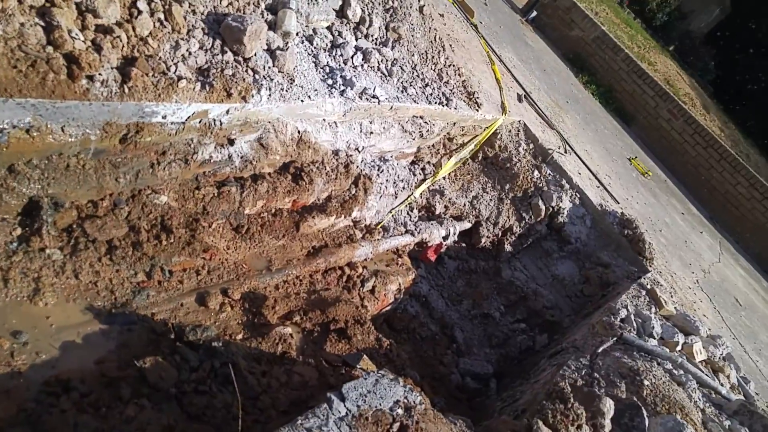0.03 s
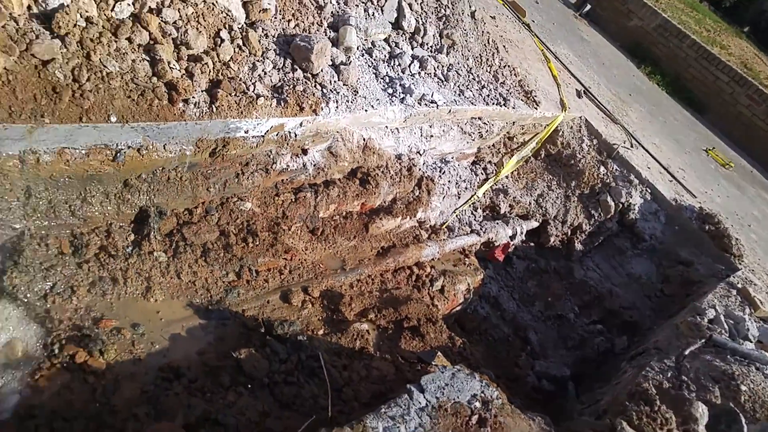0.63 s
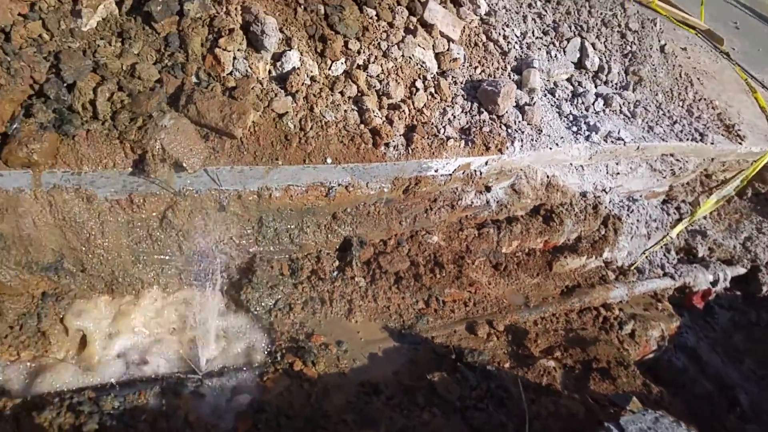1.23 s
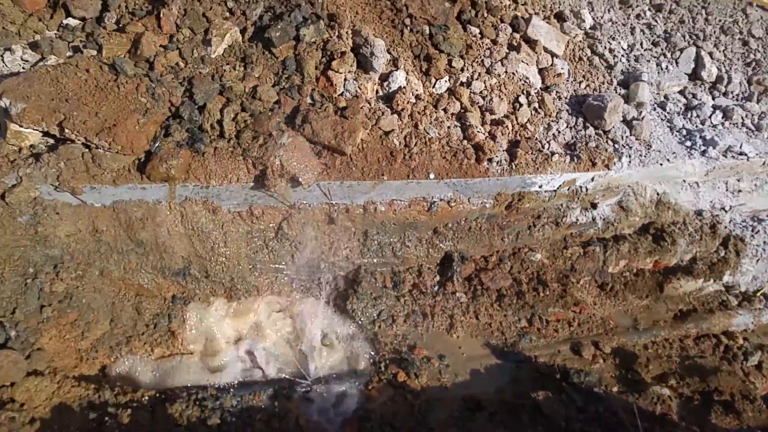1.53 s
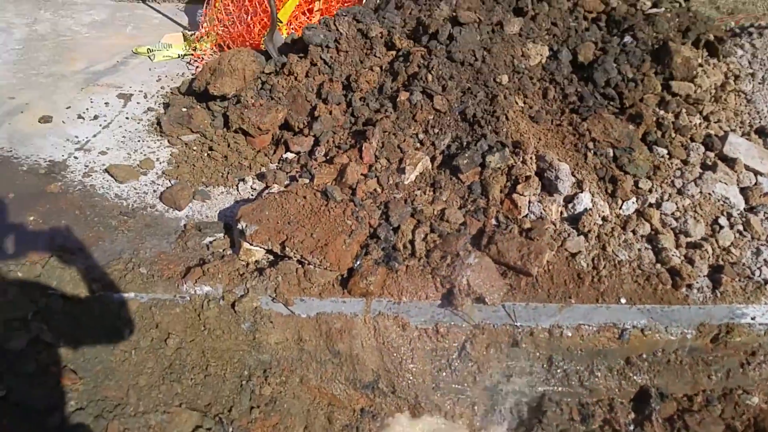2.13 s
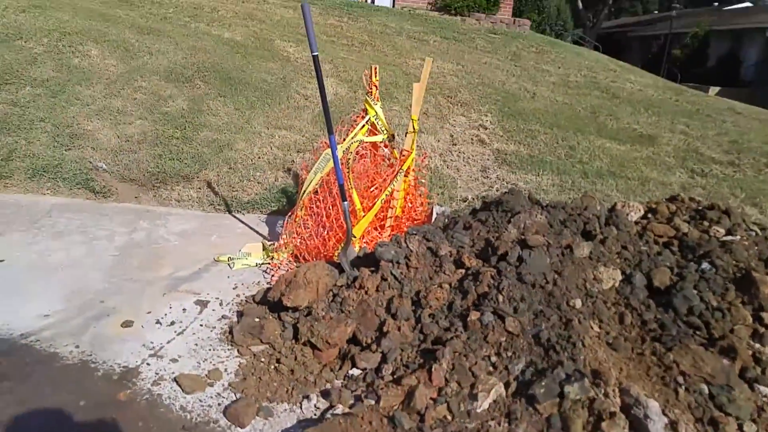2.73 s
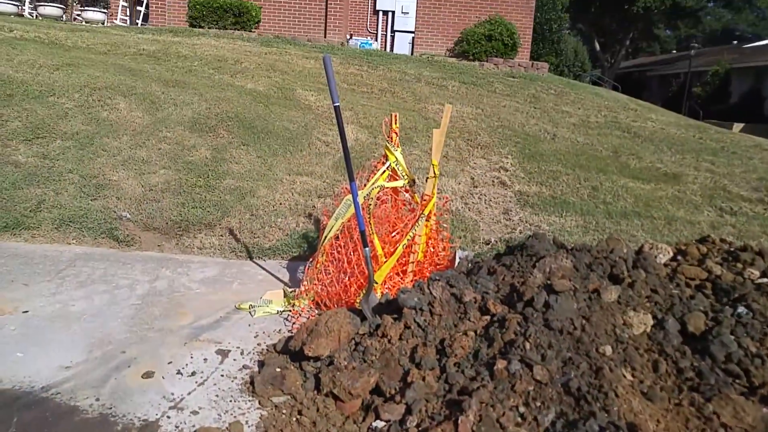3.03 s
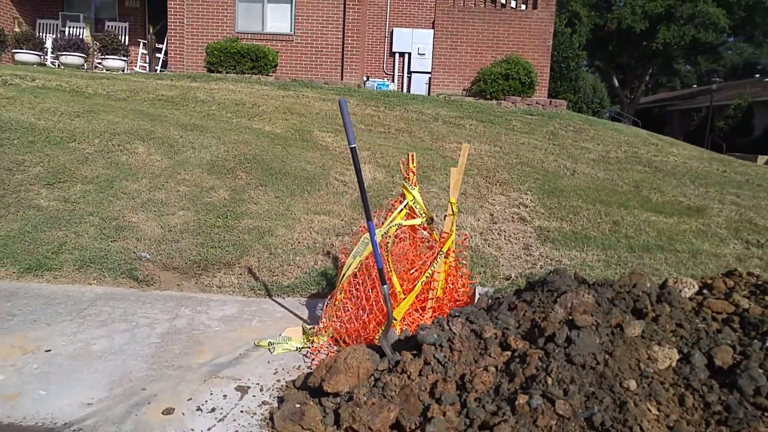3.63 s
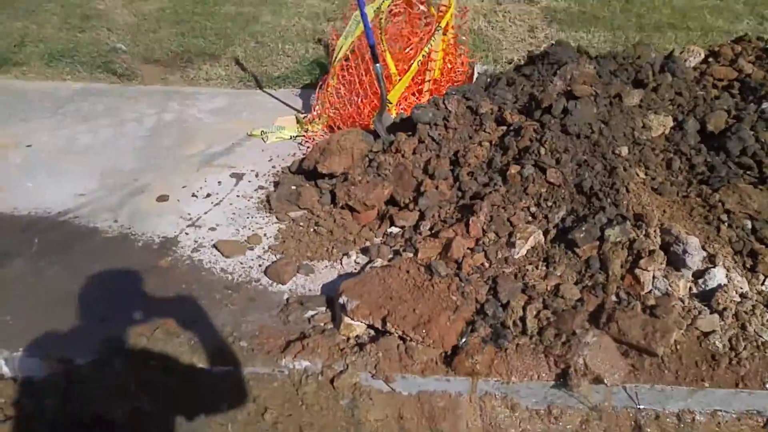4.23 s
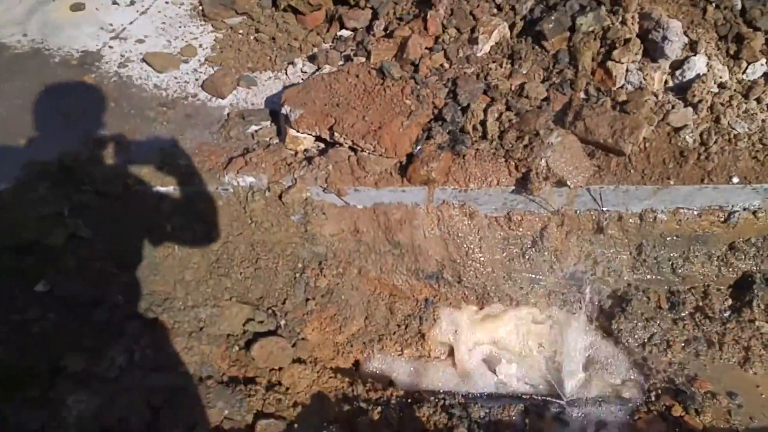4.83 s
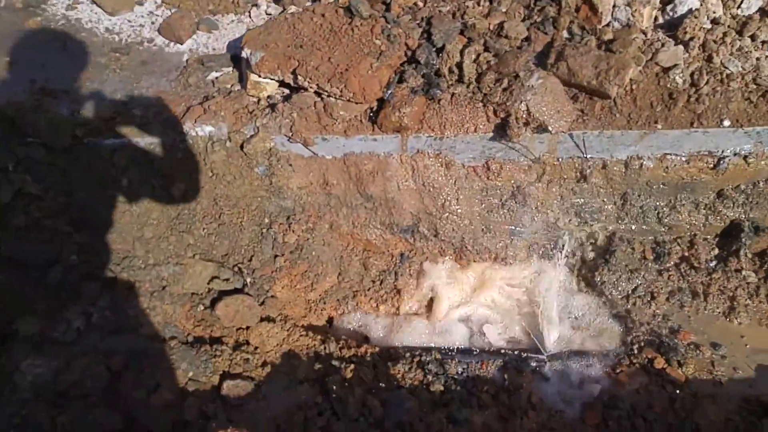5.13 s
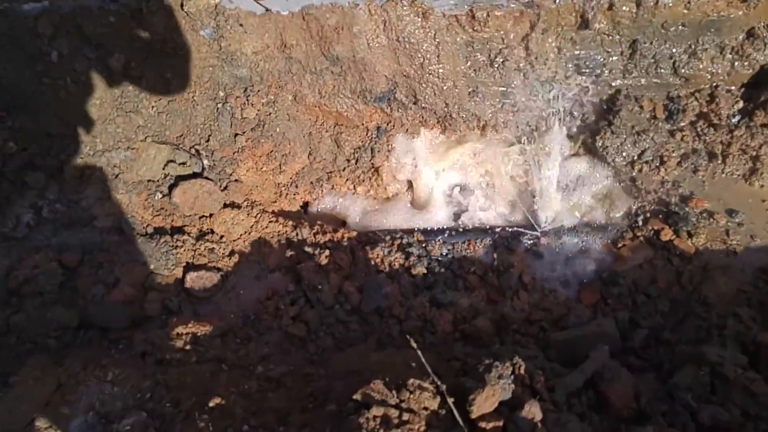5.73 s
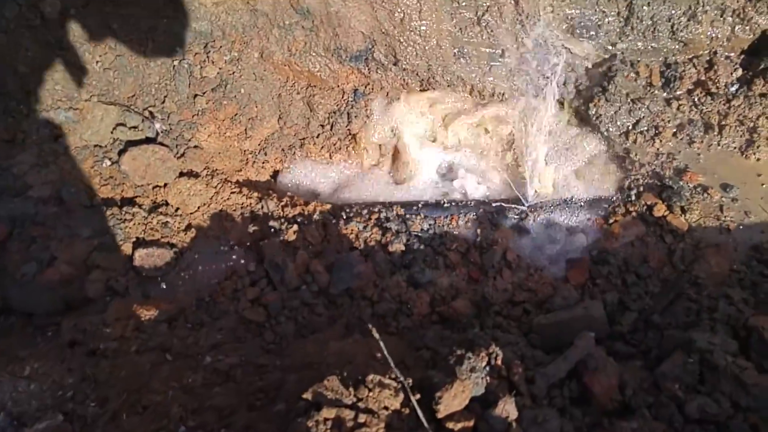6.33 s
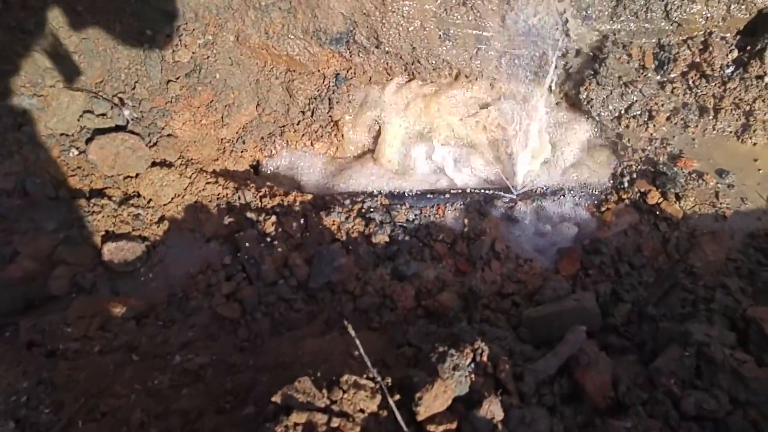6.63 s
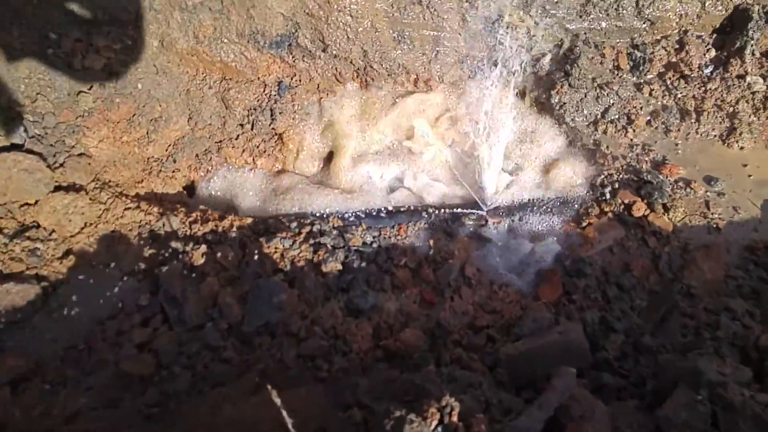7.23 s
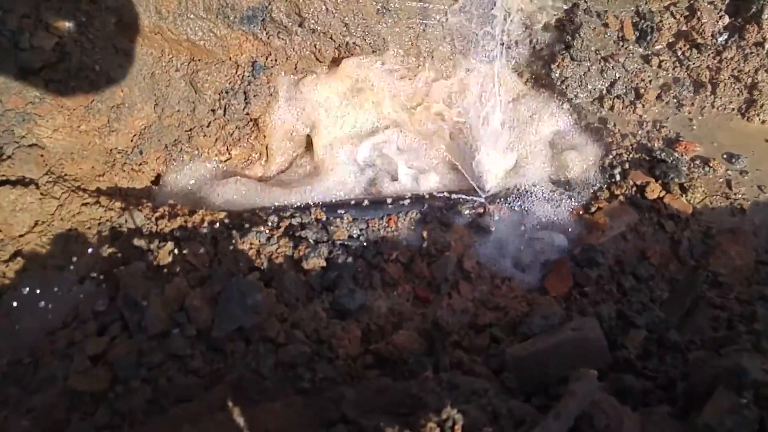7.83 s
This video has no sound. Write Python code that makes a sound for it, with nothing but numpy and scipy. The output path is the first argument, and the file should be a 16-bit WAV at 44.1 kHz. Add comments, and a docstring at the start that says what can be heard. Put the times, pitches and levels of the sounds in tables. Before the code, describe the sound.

A split water main sprays into an open earth trench with a hard, steady hiss, spattering the wall and churning a muddy pool over a low rumble. The tone of the water shifts as a hand-held stereo microphone swings past. Around the middle, wind thumps the microphone, mostly on the left. Near the end the microphone leans over the leak and the bubbling grows fuller.

```python
"""A hard hiss and steady splashing: a split water main sprays into an open earth trench.
The jet hisses at the crack, spatters the trench wall and churns a muddy pool full of ringing bubbles,
all throbbing slightly with the water pressure, over a low rumble. At the edge, a hand-held stereo
microphone swings past the leak and finally leans over it, which shifts the tone of the water.
A breeze buffets the microphone's two ports (its left and right openings)."""
import sys
import numpy as np
from scipy import signal
from scipy.fft import rfft, irfft, next_fast_len
from scipy.io import wavfile
from scipy.ndimage import map_coordinates

SR = 44100
rng = np.random.default_rng(int(sys.argv[2]) if len(sys.argv) > 2 else 0)


def inscribe(sig):
    """Save sig as 16-bit PCM at rate SR to the path in sys.argv[1].

    A 1-D sig is mono; a 2-D sig holds one channel per row.
    Samples are clipped to [-1, 1] before scaling.
    """
    pcm = np.round(np.clip(np.atleast_2d(sig).T, -1, 1) * 32767)
    wavfile.write(sys.argv[1], SR, pcm.astype(np.int16))


N = 348390
WINDOW, HOP = 2048, 512  # samples in one short frame of sound, and between frames
TIME = np.arange(N) / SR
FRAME_TIME = np.arange(-(-N // HOP) + 1) * HOP / SR
BIN_HZ = np.maximum(np.arange(WINDOW // 2 + 1) * SR / WINDOW, 1)

# Where the leak lies. Each row: time in seconds, share to the side, share ahead; the rest is below.
LEAK_DIRECTION = [(0, 1, 0.07), (.8, 0.84, 0), (1.8, 0.05, 0.34), (4.1, 0.06, 0.02), (5.3, 0.01, 1),
                  (7.9, 0.1, 0.97)]
# How late the leak's treble reaches the left port. Each row: time in seconds, delay in milliseconds.
LEFT_DELAY = [(0, -0.57), (.5, -0.51), (1, -0.38), (1.5, -0.23), (1.8, -0.1), (2.3, 0.013), (3.1, 0.11),
              (4.4, .14), (5.2, 0.1), (6, 0.08), (6.6, 0.049), (7.2, 0.039), (7.9, 0.039)]
# Unequal resonances delay the left treble further. Each row: pitch in Hz, phase lag in radians.
PORT_SKEW = [(7200, 0.098), (8600, 1.65), (12000, 1.2)]
# How alike the ports sound, 0 to 1. Each row: pitch in Hz, with the leak screened, with it ahead.
PORT_LIKENESS = [(40, 0.96, 1), (150, 0.98, 1), (400, 0.99, .98), (1100, 0.74, 0.98), (1500, 0.75, 0.99),
                 (2250, 0.72, 0.91), (3050, 0.12, .2), (3800, 0.27, 1), (6000, 0.41, 0.43),
                 (8000, 0.14, 0.11), (9400, 0.18, 0.41), (11400, 0.14, 0.15), (16000, .15, .15)]
# The moving wall echoes; shorter paths raise their pitch. Each row: time in seconds, pitch ratio, strength.
WALL_ECHO = [(0, 0.89, 0.94), (1.4, 0.97, 1.46), (2.4, 1.02, 1.4), (3.6, 1.07, 1.06), (5.2, 0.96, 1.47),
             (6.6, 0.92, 0.51), (7.9, 0.95, 0.13)]

# Gusts of wind. Each row: middle in seconds, half length in seconds, left and right strength in dB.
GUSTS = [(0.127, 0.056, -21.5, -27), (0.456, 0.11, -27, -29), (0.617, 0.047, -33, -29),
         (1.957, 0.052, -26, -35), (3.265, 0.022, -17.5, -36), (3.313, 0.033, -22.5, -38),
         (3.362, 0.017, -19, -36), (3.44, 0.067, -33, -40), (3.534, 0.025, -21, -24),
         (3.584, 0.068, -18, -25), (3.71, 0.05, -25.5, -42), (3.816, 0.037, -24.5, -42),
         (3.99, 0.033, -26, -44), (4.07, 0.025, -36, -24), (4.538, 0.087, -26.5, -53),
         (5.63, 0.32, -38, -49)]
# Single eddies that slap the left port. Each row: time in seconds, peak in dB, pitch in Hz.
SLAPS = [(3.251, -8, 260), (3.276, -13, 110), (3.365, -2, 210), (3.520, -8, 270), (3.547, -7, 120),
         (3.575, -6, 190), (3.628, -7, 95)]
# Tone of the wind's thump, its brighter buffeting and the rumble. Each row: pitch in Hz, gain in dB.
THUMP_TONE = [(15, -35), (30, -18), (50, 3), (70, -2.5), (110, -4), (170, -17.5), (300, -21.5), (500, -40),
              (1000, -78)]
BUFFET_TONE = [(40, -29), (100, 6), (200, -0.5), (350, -3.5), (450, -7), (550, -19), (680, -13), (900, -40),
               (2000, -82)]
RUMBLE_TONE = [(15, -45), (30, -22), (45, -3), (58, -0.5), (80, -2), (102, 2), (125, -1), (160, -4.5),
               (230, -48), (500, -68)]
# How the rumble, pool, splash and hiss swell and fade. Each row: time in seconds, relative level in dB.
RUMBLE_LEVEL = [(0, -38), (1.6, -43.5), (4.4, -45), (6.2, -42.5), (7.5, -37.5), (7.9, -39)]
CHURN_LEVEL = [(0, -29.5), (2.2, -29), (4.7, -31), (6.2, -30), (6.9, -28.5), (7.4, -26), (7.9, -24.5)]
SPLASH_LEVEL = [(0, -23.5), (1.1, -22), (2, -24.5), (3.1, -27), (4.4, -25), (4.75, -21.7), (5.05, -23),
                (5.5, -23.5), (7.1, -23.5), (7.6, -22)]
HISS_LEVEL = [(0.0, -21.5), (0.6, -21), (1.2, -22.5), (1.6, -22), (2.2, -22.5), (2.9, -22), (3.5, -21.5),
              (3.9, -24), (4.4, -22), (4.8, -20.5), (5.4, -22), (6.2, -22), (6.7, -22), (7.2, -20.5),
              (7.9, -21.5)]
# The throbbing water pressure. Each row: time in seconds, throbs per second.
THROB_RATE = [(0, 3.9), (5.2, 3.16), (5.6, 2.9), (6.1, 5.02), (7.9, 1.9)]

# Tone of the churning pool. Each row: pitch in Hz, gain in dB.
CHURN_TONE = [(70, -17), (140, -10), (200, -3), (290, -1), (370, 1.5), (450, -2), (520, -20.5),
              (650, -12.5), (1000, -70)]
# Hollow notes of the trench floor. Each row: pitch in Hz, width in Hz, relative weight in dB.
FLOOR_NOTES = [(370, 19, -1), (458, 31, 1)]
# How well those notes reach the microphone. Each row: time in seconds, lift in dB before weighting.
FLOOR_NOTE_LIFT = [(0, -0.5), (2, -0.5), (2.8, 7), (3.8, 1), (4.6, -2.5), (5.8, -4.5), (6.5, 1), (7, 4.5),
                   (7.45, 9), (7.9, 6)]
# A dip just under those notes. Each row: time in seconds, pitch in Hz, gain in dB.
FLOOR_DIP = [(5, 324, -5), (6, 320, -13), (7, 322, -8.5), (7.9, 315, -5)]

# Tone of the splash. Each row: pitch in Hz, gain in dB from behind the trench edge, then from above it.
SPLASH_TONE = [(308, -66, -41), (483, -4, 6.5), (553, -3.5, 3), (614, -4.5, 7), (674, -5, -1.5),
               (736, 0, 1), (920, 4, 0), (1170, -2, 0.5), (1610, -4, -0.5), (2090, -8.5, -1.5),
               (2630, -8, -16), (2920, -44, -43)]
# Where wall echoes cancel the splash. Each row: pitch in Hz, exponent on the echo's pitch ratio,
# then depth in dB (at echo strength 1) with the leak to the side, below and ahead.
WALL_NULLS = [(528, 0.45, 22, 9.8, 13), (725, 1.3, 1.5, 11.3, 1), (1421, 0.14, 6, 6.3, 4.1),
              (2107, 1.3, 2, 5.3, 4.2)]
# Four moving bands in the splash. Each row: time in seconds, pitch in Hz, gain in dB.
STANDING_WAVE = [(0, 874, 4.5), (1.5, 950, 1), (2.5, 1060, -1.5), (4.8, 1140, -0.5), (5.8, 1070, -2.5),
                 (6.5, 1000, 6), (7, 915, 6.5), (7.5, 806, 6.5), (7.9, 816, 6.5)]  # rings across the trench, sinking as the microphone leans in
TRENCH_TROUGH = [(5.2, 920, -5), (5.8, 875, -6), (6.2, 825, -5), (6.55, 810, -5), (7, 706, -7),
                 (7.5, 685, -1), (7.9, 675, -5)]  # a dip below the standing wave, sinking with it
EDGE_NULL = [(4.8, 2080, 2), (5.25, 1860, -3), (5.7, 1680, -13), (6.1, 1360, -2), (6.8, 1290, -6),
             (7.4, 1300, -1.5)]  # a cancelled band that falls as the microphone clears the edge
PASSING_PEAK = [(1.3, 1800, 0), (1.8, 1900, 4.5), (2.1, 1950, 4), (2.7, 1900, 0)]  # a bright band that swells as the microphone swings past

# Tone of the hiss from the side, below and ahead. Each row: pitch in Hz, left and right gain in dB.
HISS_ASIDE = [(1900.0, 2.5, -17), (2640, 0.5, -14), (3270, 4.5, 2), (3740, 0.5, 0.9), (4460, 1, -0.5),
              (5600, 0.8, -5), (6070, 0.5, 3.5), (6760, 9, 18), (7700, 1, 8), (8140, 7, -0.5),
              (9400.0, 1, 5.5), (10300, -0.5, 3), (11600.0, 0, -6.5), (13200.0, -2.5, -3),
              (15600.0, -6, -8)]
HISS_BELOW = [(1900.0, -0.5, -7), (2550.0, 3.7, -19), (3270, 2.8, -6), (3700.0, 5.5, -6),
              (4300, -5.5, -0.5), (5200.0, -2, -0.3), (6300, -6, 4), (6900.0, 1.5, -4.0), (7600.0, 4, 0),
              (8430, 3, 12), (9430, 3, 6.5), (10600, 3, -1.5), (11600.0, 3, 2), (13200.0, 3, -2),
              (15600.0, -3.5, -1)]
HISS_AHEAD = [(1900,-4,-5.5), (2580,0,-7), (3120,-4.5,-6), (3900,-4.5,-7), (4520,-3,2), (5070,1,1.5),
              (6050,2,-2), (6860,1,3.5), (7560,5.5,3), (8160,9.5,1.1), (9300,7.5,9), (10570,0.5,6.5),
              (11700,-4,2.5), (13200,-2.5,0.5), (15600,-8,-7)]
# Two broad bands in the hiss. Each row: time in seconds, pitch in Hz, left and right gain in dB.
SINKING_BAND = [(0.0, 6940, -0.5, -12), (2.2, 6230, 2, 2.2), (3.3, 6070, 2.5, -3), (4.2, 6100.0, 2, 4),
                (4.7, 6450, 6.5, 3.7), (5.4, 6400.0, 5, 3.3), (6.2, 5760, 2, 3), (6.8, 5270, 1.8, 0.7),
                (7.3, 4870, 3, 1.5), (7.9, 4500.0, 5, 1)]  # louder or softer at each port, sinking as the microphone leans in
PORT_SIZZLE = [(0,8550,3,-1.5), (.6,8950,-0.5,2.5), (1,9200,4.5,6), (1.35,9000,6,5), (1.8,8740,0,6),
               (2.2,8600,5,8), (2.7,8360,5.5,3.5), (3.3,8500,4.5,-1.5), (3.7,8950,5.5,2.5),
               (4.15,8750,5,5.5), (4.5,8650,-2,3), (5,8800,-4,2), (5.5,8800,-3,1), (6.1,8900,3,4),
               (6.7,8800,4.5,7), (7.3,8500,3.5,2), (7.9,8700,3,4)]  # each port's own resonance, stirred by the jet
# Four narrower bands in the hiss. Each row: time in seconds, pitch in Hz, gain in dB.
LEFT_GAP = [(.8,5640,2), (1.5,5900,-3), (2.4,6100,-3.5), (3.3,5500,-4), (3.9,5100,-2), (4.3,4800,-6),
            (4.9,3900,-4), (5.5,3270,-9), (6.5,2930,-9), (7.9,3060,-4)]  # a gap at the left port, gliding as the microphone turns
RIGHT_GAP = [(0.0, 2550.0, -6), (1.5, 2750.0, -11), (2.3, 3000.0, -7), (3.3, 3100.0, -13),
             (4.4, 3200.0, -8.8), (5.0, 3220, -5), (5.6, 3100.0, -8), (6.6, 2950.0, -4), (7.9, 2920, -5)]  # the same at the right port
RIGHT_HIGH_GAP = [(.6, 8500, 0), (1.1, 8900, -2.5), (1.6, 10200, -5), (2.2, 11500, -7), (3.2, 13300, -3.5),
                  (4.2, 12900, -2.5), (5.4, 12500, -3.5), (7.9, 12100, -5)]  # a much higher cancelled band that sweeps up
HISS_RING = [(0, 3250, 1.5), (1.6, 3500, 2.5), (3.5, 3550, 2.5), (4.6, 3550, 0), (6.4, 3550, 0),
             (7.5, 3450, 3)]  # a hollow resonance just above the right gap
# The jet spurts or briefly falters. Each row: time in seconds, change in dB (the hiss takes a share).
SPURTS = [(.218,3), (.372,0), (.627,-2.5), (.975,3), (1.205,1), (1.547,3), (2.357,-0.5), (2.514,1.3),
          (3.161,1.5), (3.41,-1.1), (3.553,1.1), (4.072,3), (4.496,-1), (5.544,-1.5), (6.031,-2), (6.147,2),
          (6.249,-1.5), (6.438,2)]


def from_db(db):
    """Turn decibels into a gain to multiply by."""
    return 10 ** (np.asarray(db) / 20)


def unit_power(x):
    """Scale a signal to an average power of 1."""
    return x / np.sqrt(np.mean(np.abs(x) ** 2) + 1e-20)


def even_power(tone_db):
    """Keep the total power steady while a tone changes."""
    return tone_db - 10 * np.log10(np.mean(from_db(tone_db) ** 2, axis=-2, keepdims=True))


def in_time(rows, when):
    """Read each column of a table at the given times."""
    seconds, *columns = np.transpose(rows)
    return np.array([np.interp(when, seconds, column) for column in columns])


def in_hz(rows):
    """Read each column of a table at every pitch in BIN_HZ: columns x pitches x 1."""
    hz, *columns = np.transpose(rows)
    return np.array([np.interp(np.log(BIN_HZ), np.log(hz), column) for column in columns])[..., None]


def swell(middle_s, half_s):
    """A smooth rise and fall in time, of height 1."""
    return np.exp(-np.minimum(((TIME - middle_s) / half_s) ** 2, 50))


def hump(hz, width_hz):
    """A smooth peak around one pitch, of height 1."""
    return np.exp(-((BIN_HZ[:, None] - hz) / width_hz) ** 2)


def glide_db(rows, width_hz):
    """A peak or dip that moves in pitch and height, shared by the ports or with a height for each."""
    hz, *db = in_time(rows, FRAME_TIME)
    return np.array(db)[:, None] * hump(hz, width_hz)


def drift(per_s):
    """A smooth random wander of about size 1, turning roughly per_s times a second."""
    step = 40  # samples between random values
    pole = np.exp(-2 * np.pi * step * per_s / SR)
    noise = rng.standard_normal(N // step + 2002)
    slow = signal.lfilter([1], [1, -2 * pole, pole * pole], noise)[2000:]  # skip while it settles
    return np.interp(np.arange(N) / step, np.arange(len(slow)), unit_power(slow))


def shaped_noise(tone):
    """Two unrelated rows of steady noise with the given tone."""
    size = next_fast_len(N)
    gain = np.interp(np.arange(size // 2 + 1) * SR / size, BIN_HZ, from_db(in_hz(tone)).ravel())
    spectrum = rfft(rng.standard_normal((2, size))) * gain
    return unit_power(irfft(spectrum, size)[:, :N])


def leak_direction():
    """How much the leak lies to the side and how much ahead, each 0 to 1."""
    return np.clip(in_time(LEAK_DIRECTION, FRAME_TIME), 0, 1)


def at_ports(pair, tone_db):
    """Make stereo from two unrelated sounds: the first reaches both ports, the far one later."""
    framing = dict(nperseg=WINDOW, noverlap=WINDOW - HOP)
    shared, side = signal.stft(pair.astype(np.float32), **framing)[2]
    _, ahead = leak_direction()
    screened, in_view = in_hz(PORT_LIKENESS)
    alike = np.clip((1 - ahead) * screened + ahead * in_view, 0, 1)
    sign = np.array([1, -1])[:, None, None]
    ports = np.sqrt(1 + alike) * shared + sign * np.sqrt(1 - alike) * side
    hz = BIN_HZ[:, None]
    # long waves reach both ports almost together
    lag_s = in_time(LEFT_DELAY, FRAME_TIME) / 1000 * hz / np.hypot(hz, 600)
    phase = 2 * np.pi * hz * lag_s + in_hz(PORT_SKEW)[0]
    ports = ports * from_db(tone_db) * np.exp(-1j * sign * phase / 2)
    return unit_power(signal.istft(ports, **framing)[1][..., :N])


def rumble(level_db):
    """A dull rumble, nearly the same at both ports."""
    noise = at_ports(rng.standard_normal((2, N)), in_hz(RUMBLE_TONE))
    return noise * from_db(in_time(RUMBLE_LEVEL, TIME) + level_db)


def wind(thump_db, buffet_db, steepness, breeze_db=-52, swing_db=6, eddies_per_s=2.1, port_limit=0.75):
    """Swirls of air (eddies) thump on each port; harder puffs break into a brighter buffeting."""
    push = from_db(breeze_db + swing_db * np.array([drift(eddies_per_s), drift(eddies_per_s)]))
    push += sum(from_db([[left], [right]]) * swell(s, half_s) for s, half_s, left, right in GUSTS)
    thump = from_db(thump_db) * shaped_noise(THUMP_TONE)
    buffet = from_db(buffet_db) * (push / push.max()) ** steepness * shaped_noise(BUFFET_TONE)
    slaps = np.zeros(N)
    for s, peak_db, hz in SLAPS:  # a passing eddy is one push between two pulls
        distance = np.minimum((np.pi * hz * (TIME - s)) ** 2, 20)
        slaps += from_db(peak_db) * (1 - 2 * distance) * np.exp(-distance)
    blows = push * (thump + buffet) + slaps * [[1], [0]]
    return port_limit * np.tanh(blows / port_limit)  # the hardest blows overload the port


def throb(first_crest_s=0.21):
    """The regular swing of the water pressure, between -1 and 1."""
    turns = np.cumsum(in_time(THROB_RATE, TIME)[0]) / SR
    return np.cos(2 * np.pi * (turns - np.interp(first_crest_s, TIME, turns)))


def bubbles(per_s, low_hz, high_hz, cycles, rise, spread_db):
    """Trapped air rings briefly, big bubbles lower and longer, rising in pitch near the surface."""
    out = np.zeros(N)
    for when, pitch, strength in rng.random((int(per_s * N / SR), 3)):
        hz = low_hz * (high_hz / low_hz) ** pitch
        start = int(when * N)
        length = min(int(cycles / hz * SR), N - start)
        age = np.arange(length) / SR * hz / cycles  # 0 to 1 over the bubble's life
        ring = np.sin(2 * np.pi * cycles * age * (1 + rise * age / 2))
        out[start:start + length] += from_db(spread_db * strength - 60 * age) * ring
    return unit_power(out)


def churn(level_db, bubble_db, bass_follows):
    """The jet drives air into the pool, which boils with big bubbles; the louder, the more bass."""
    gulps = bubbles(per_s=70, low_hz=160.5, high_hz=467, cycles=18, rise=0.12, spread_db=5)
    water = rng.standard_normal((2, N)) + from_db(bubble_db) * gulps * [[1], [0]]
    notes = sum(from_db(db) * hump(hz, width_hz) for hz, width_hz, db in FLOOR_NOTES)
    tone_db = in_hz(CHURN_TONE) + in_time(FLOOR_NOTE_LIFT, FRAME_TIME) * notes
    tone_db += glide_db(FLOOR_DIP, width_hz=20.4)
    boil_db = in_time(CHURN_LEVEL, FRAME_TIME)
    tone_db += bass_follows * (boil_db - boil_db.mean()) * hump(hz=135, width_hz=24)
    return at_ports(water, even_power(tone_db)) * from_db(in_time(CHURN_LEVEL, TIME) + level_db)


def droplets(per_s, share):
    """Single drops of uneven size hit over the wash of countless small ones; two unrelated rows."""
    impacts = (rng.random((2, N)) < per_s / SR) * rng.standard_normal((2, N))
    wash = rng.standard_normal((2, N))
    return np.sqrt(share) * unit_power(impacts) + np.sqrt(1 - share) * wash


def wall_nulls_db():
    """Echoes off the trench walls cancel the direct sound at a few pitches, which slide together."""
    aside, ahead = leak_direction()
    ratio, strength = in_time(WALL_ECHO, FRAME_TIME)
    cut_db = 0
    for hz, exponent, aside_db, below_db, ahead_db in WALL_NULLS:
        depth_db = aside * aside_db + (1 - aside - ahead) * below_db + ahead * ahead_db
        cut_db += depth_db * hump(hz * ratio ** exponent, width_hz=60 + 0.042 * hz)
    return -strength * cut_db


def scatter_db(ripple_db, shortest_s, longest_s, stretch, fade_hz=7000, echoes=10):
    """Weak echoes off lumps of earth ripple the tone, least in the treble, sliding with the wall echoes."""
    ratio = in_time(WALL_ECHO, FRAME_TIME)[0]
    delays_s = rng.uniform(shortest_s, longest_s, (echoes, 1))
    turns = delays_s * BIN_HZ + rng.random((echoes, 1))
    ripple = unit_power(np.cos(2 * np.pi * turns).sum(axis=0))
    ripple /= 1 + (BIN_HZ / fade_hz) ** 4
    return ripple_db * np.interp(BIN_HZ[:, None] / ratio ** stretch, BIN_HZ, ripple)


def splash(level_db, surge_db, bubble_db, shade_db, left_lift_db, right_cut_db):
    """Drops and small bubbles on the wall and the pool, their tone shaped by the trench."""
    aside, ahead = leak_direction()
    screened_db, open_db = in_hz(SPLASH_TONE)
    tone_db = (1 - ahead) * screened_db + ahead * open_db + wall_nulls_db()
    tone_db += scatter_db(ripple_db=1.3, shortest_s=0.00391, longest_s=0.012, stretch=0.98)
    tone_db = tone_db + glide_db(STANDING_WAVE, width_hz=110) + glide_db(TRENCH_TROUGH, width_hz=56)
    tone_db += glide_db(EDGE_NULL, width_hz=71)
    tone_db = even_power(tone_db) + glide_db(PASSING_PEAK, width_hz=300)
    # the microphone's body shades the left port while the leak is off to the side
    tone_db = tone_db + shade_db * aside * np.array([-1, 1])[:, None, None]
    # and around 2 kHz it lifts the left port and cancels at the right
    tone_db[0] += aside * left_lift_db * hump(hz=1970, width_hz=270)
    tone_db[1] -= aside * right_cut_db * hump(hz=2290, width_hz=510)
    plops = bubbles(per_s=260, low_hz=581, high_hz=2500, cycles=14.3, rise=0.056, spread_db=2.5)
    water = droplets(per_s=1200, share=0.16) + from_db(bubble_db) * plops * [[1], [0]]
    spray = at_ports(water, tone_db)
    return spray * from_db(in_time(SPLASH_LEVEL, TIME) + level_db + surge_db * drift(25))


def flutter_db(depth_db, bands=16, moments=200):
    """Sheets of spray flutter independently: small, quick, random level changes at each pitch."""
    band = np.linspace(0, bands - 1, len(BIN_HZ))
    moment = np.linspace(0, moments - 1, len(FRAME_TIME))
    grid = np.meshgrid(band, moment, indexing="ij")
    return depth_db * map_coordinates(rng.standard_normal((bands, moments)), grid, order=1)


def jet(level_db, flare_share, spurt_share, sizzle_surge_db=0.6, waver_db=0.6):
    """Turbulence at the crack: a hard hiss that sets the ports sizzling and brightens with each spurt."""
    aside, ahead = leak_direction()
    below = 1 - aside - ahead
    tone_db = aside * in_hz(HISS_ASIDE) + ahead * in_hz(HISS_AHEAD) + below * in_hz(HISS_BELOW)
    tone_db += glide_db(SINKING_BAND, width_hz=920) + glide_db(HISS_RING, width_hz=230)
    left_gap_db = glide_db(LEFT_GAP, width_hz=280)
    right_gaps_db = glide_db(RIGHT_GAP, width_hz=230) + glide_db(RIGHT_HIGH_GAP, width_hz=600)
    tone_db += np.concatenate([left_gap_db, right_gaps_db])
    tone_db += scatter_db(ripple_db=3.13, shortest_s=0.0011, longest_s=0.007, stretch=0.57)
    spurt_db = sum(db * swell(s, half_s=0.023) for s, db in SPURTS)
    flare_db = np.interp(FRAME_TIME, TIME, flare_share * spurt_db + sizzle_surge_db * drift(15))
    # each port has a broad resonance with a narrow notch just below it
    tone_db += glide_db(PORT_SIZZLE, width_hz=1150) + flare_db * hump(hz=9100, width_hz=1100)
    tone_db -= 7.6 * np.array([hump(hz=7830, width_hz=145), hump(hz=7800, width_hz=180)])
    tone_db -= 10 * np.log10(1 + (1600 / BIN_HZ[:, None]) ** 8)  # a narrow jet gives off no bass
    hiss = at_ports(droplets(per_s=4000, share=0.096), tone_db + flutter_db(depth_db=1.4))
    hiss_db = in_time(HISS_LEVEL, TIME) + level_db + spurt_share * spurt_db + waver_db * drift(40)
    return hiss * from_db(hiss_db)


def scene():
    """Mix the three throbbing sounds of the leak with the rumble and the breeze."""
    pressure = throb()
    hiss = jet(level_db=4, flare_share=0.5, spurt_share=0.83) * from_db(0.1 * pressure)
    spray = splash(level_db=-0.37, surge_db=1, bubble_db=-19.5, shade_db=1, left_lift_db=3, right_cut_db=8)
    spray *= from_db(0.35 * pressure)
    pool = churn(level_db=-1.16, bubble_db=-20, bass_follows=1.7)
    pool *= from_db(0.27 * pressure + drift(6.4))
    background = rumble(level_db=3.5) + wind(thump_db=-1, buffet_db=2.5, steepness=0.86)
    return background + pool + spray + hiss


def record(dry, low_hz=45, high_hz=15900):
    """Fade out the deepest bass and cut off the highest treble."""
    bass_cut = signal.sosfilt(signal.butter(7, low_hz, "high", fs=SR, output="sos"), dry)
    keep = np.arange(N // 2 + 1) * SR / N < high_hz
    return irfft(rfft(bass_cut) * keep, N)


dry = scene()
out = record(dry)
inscribe(out)
```